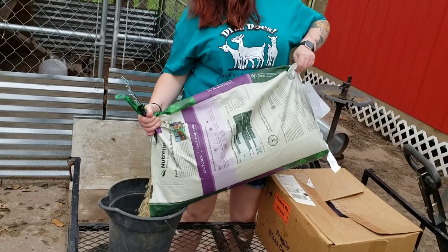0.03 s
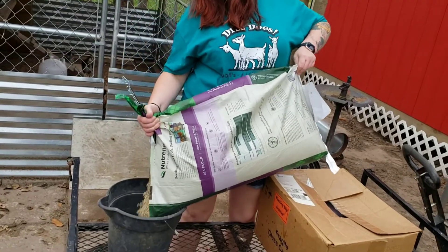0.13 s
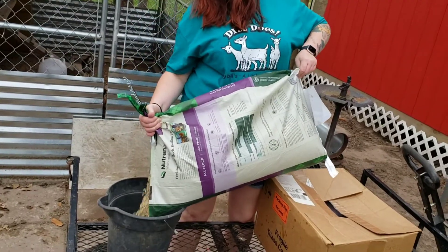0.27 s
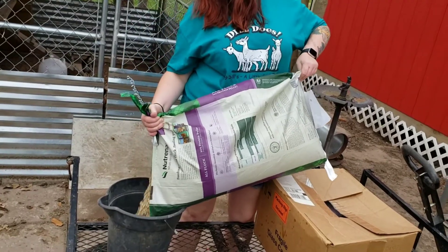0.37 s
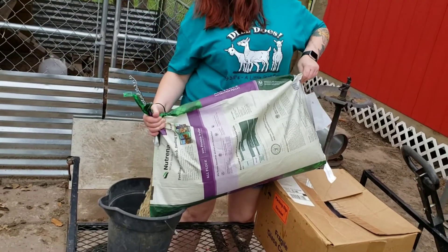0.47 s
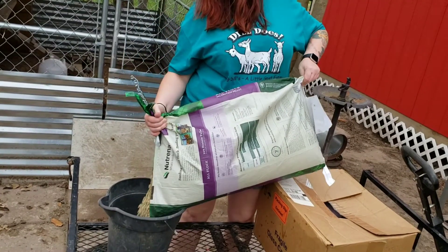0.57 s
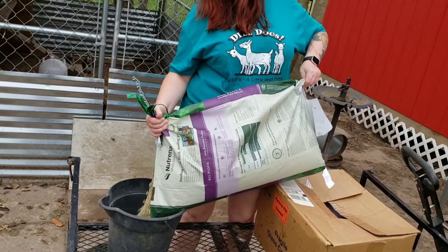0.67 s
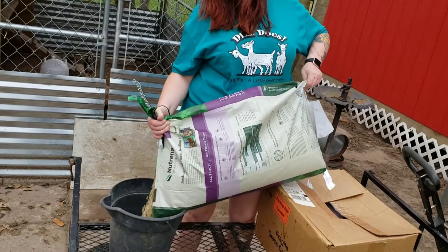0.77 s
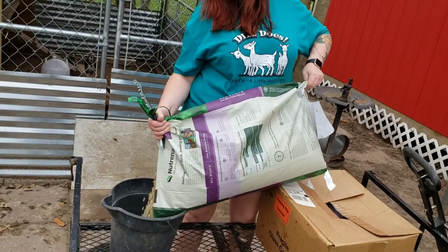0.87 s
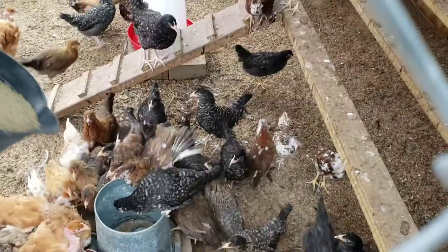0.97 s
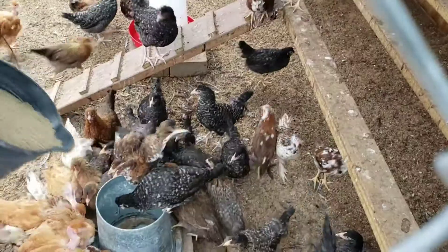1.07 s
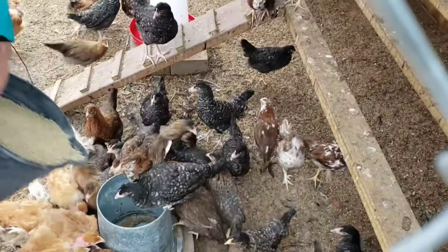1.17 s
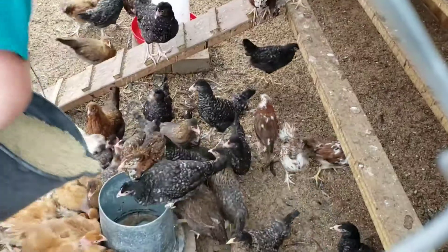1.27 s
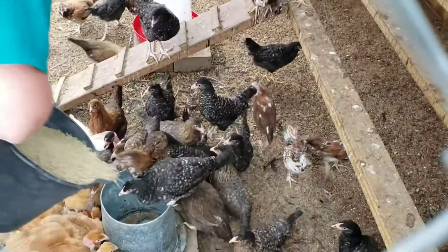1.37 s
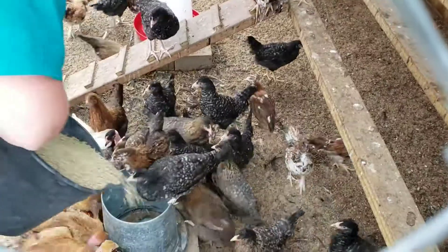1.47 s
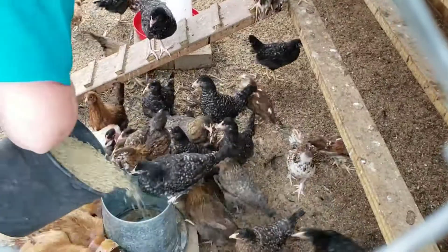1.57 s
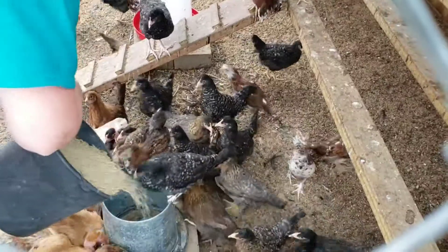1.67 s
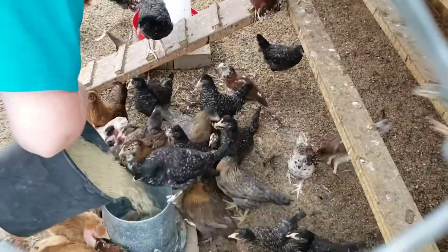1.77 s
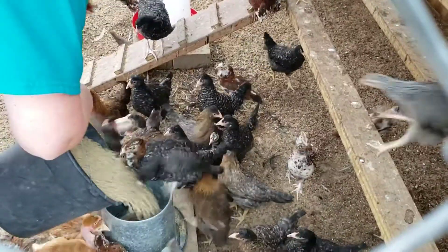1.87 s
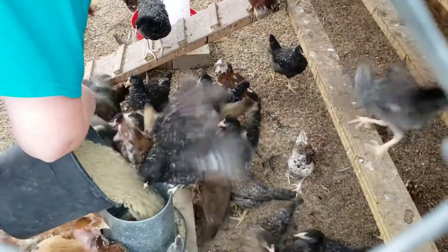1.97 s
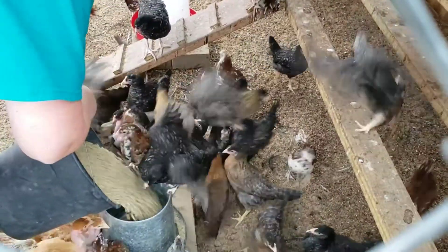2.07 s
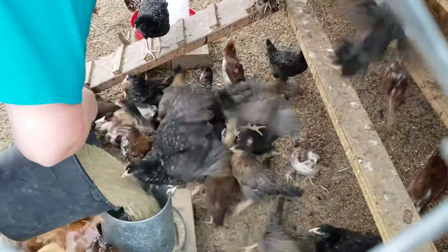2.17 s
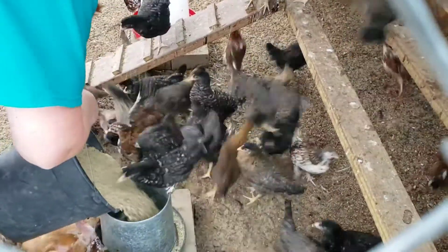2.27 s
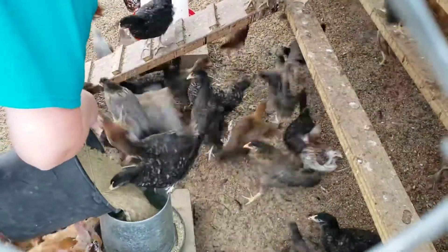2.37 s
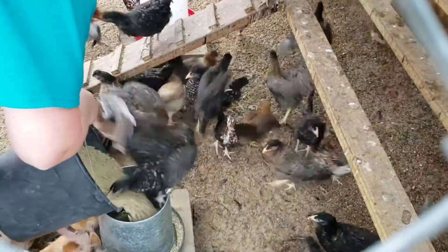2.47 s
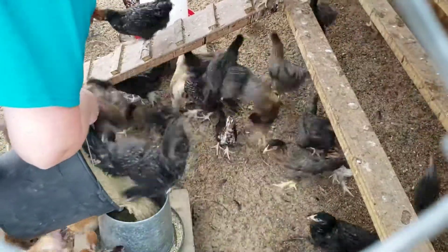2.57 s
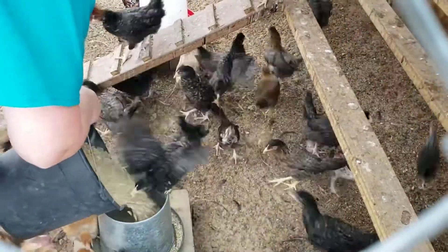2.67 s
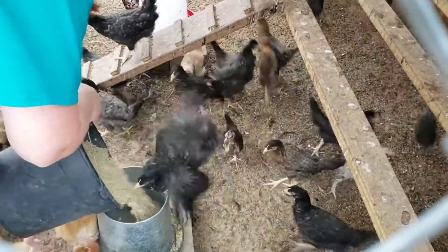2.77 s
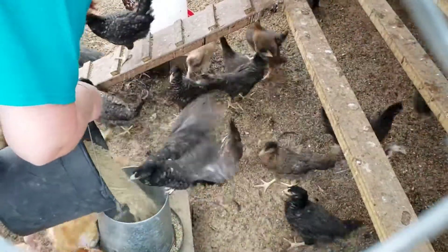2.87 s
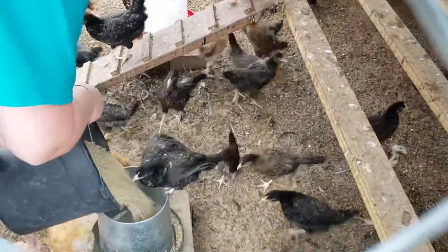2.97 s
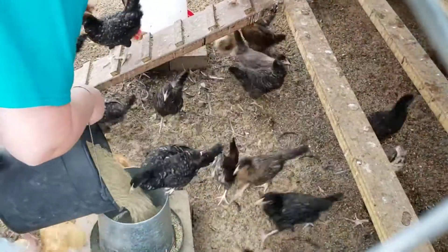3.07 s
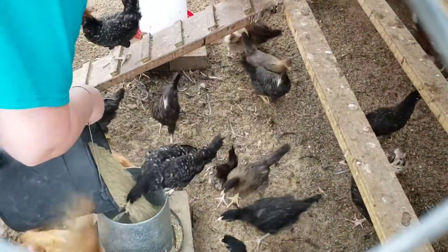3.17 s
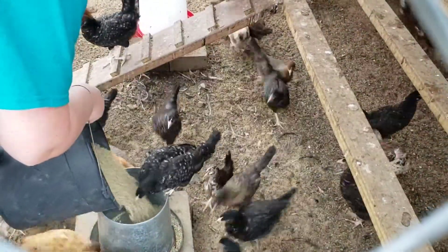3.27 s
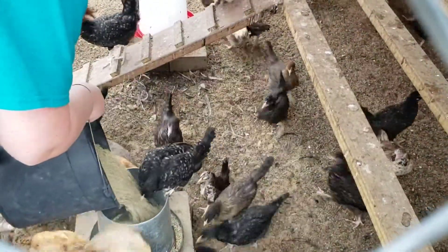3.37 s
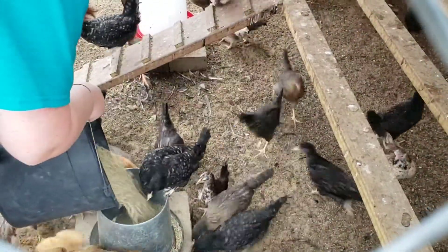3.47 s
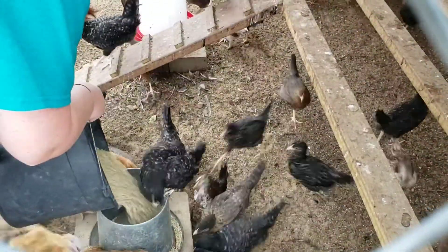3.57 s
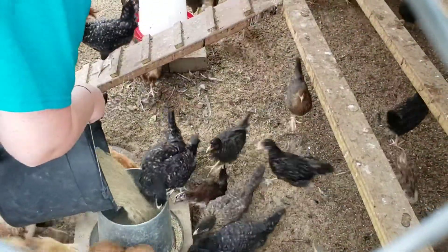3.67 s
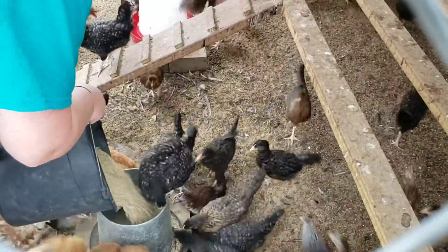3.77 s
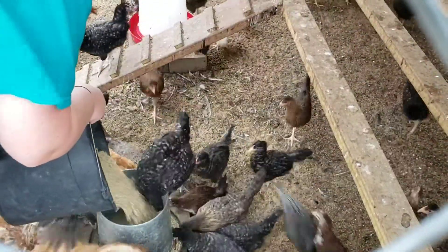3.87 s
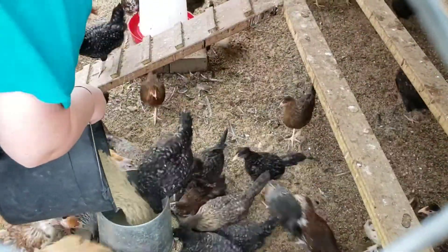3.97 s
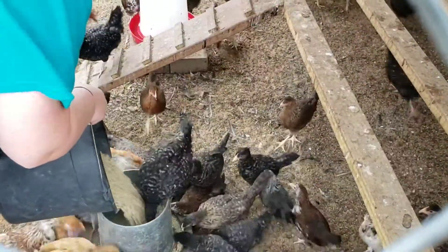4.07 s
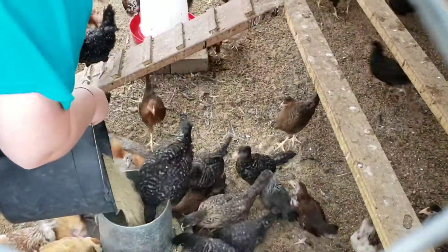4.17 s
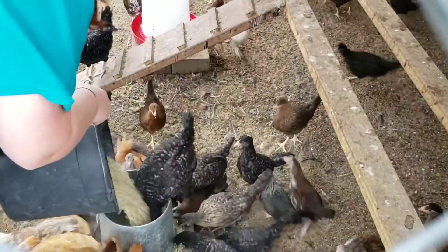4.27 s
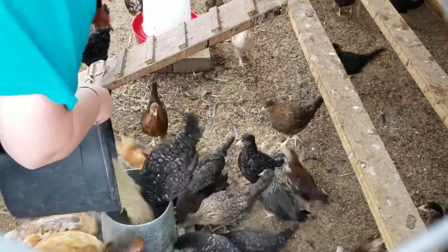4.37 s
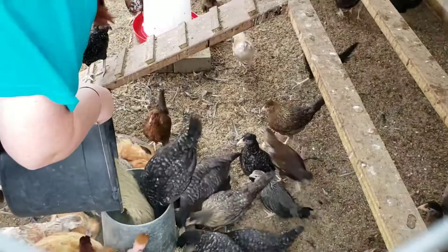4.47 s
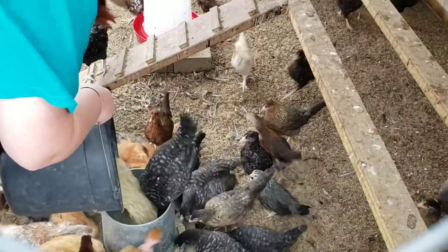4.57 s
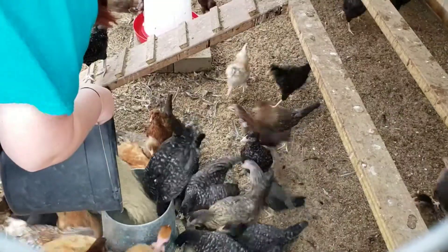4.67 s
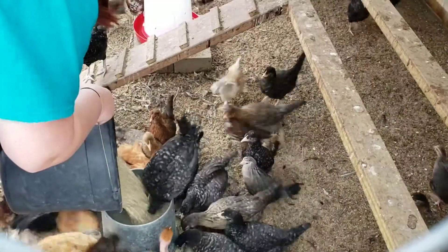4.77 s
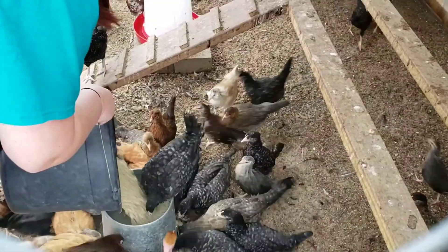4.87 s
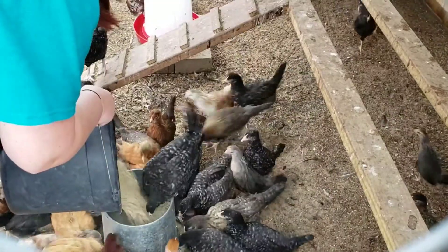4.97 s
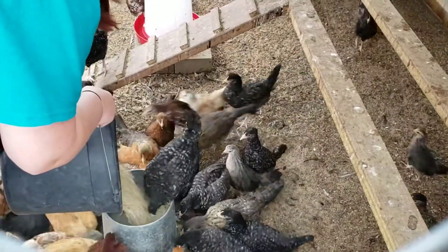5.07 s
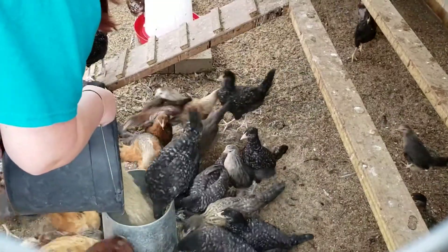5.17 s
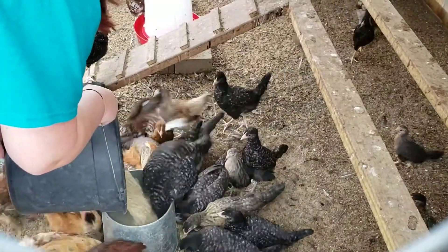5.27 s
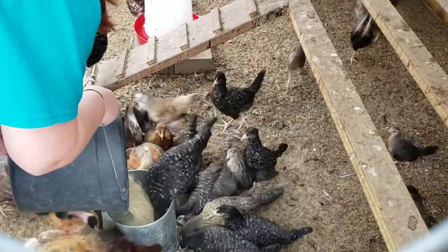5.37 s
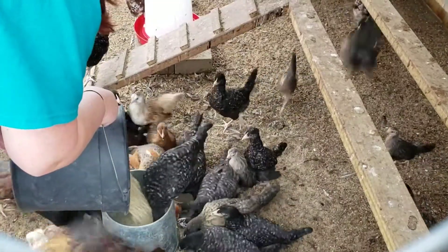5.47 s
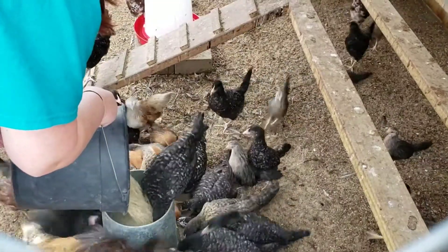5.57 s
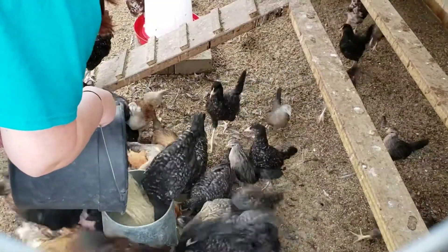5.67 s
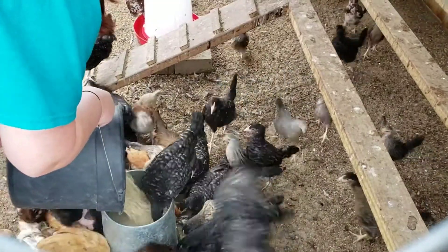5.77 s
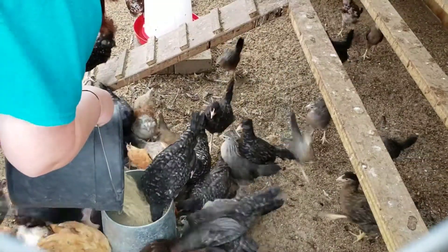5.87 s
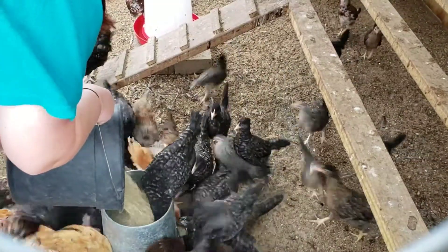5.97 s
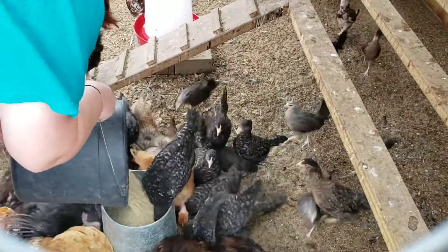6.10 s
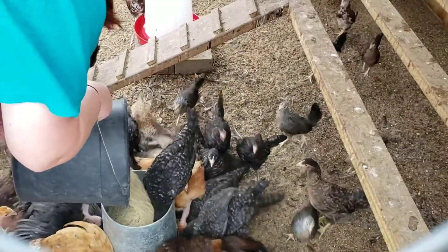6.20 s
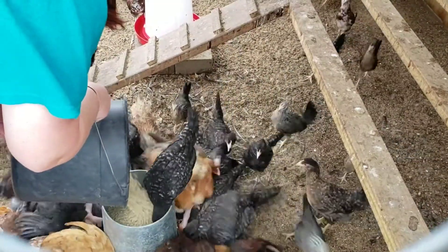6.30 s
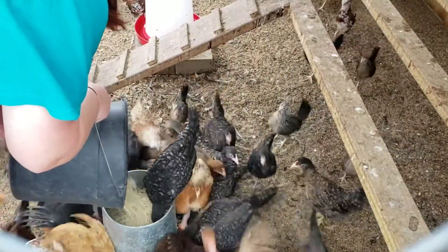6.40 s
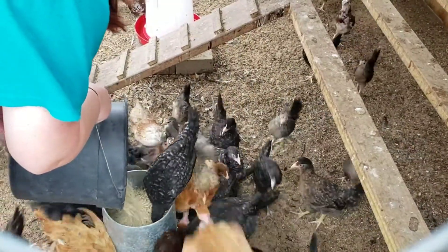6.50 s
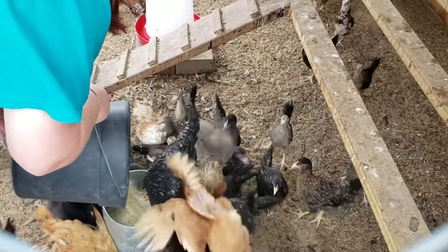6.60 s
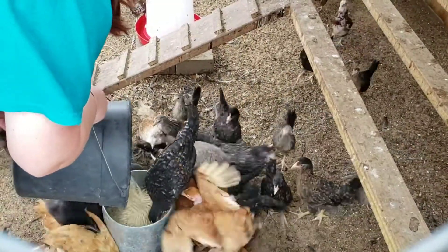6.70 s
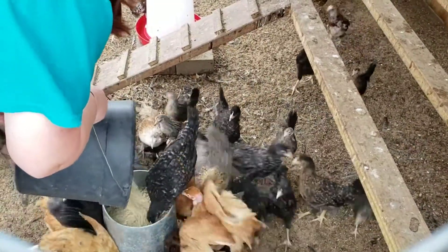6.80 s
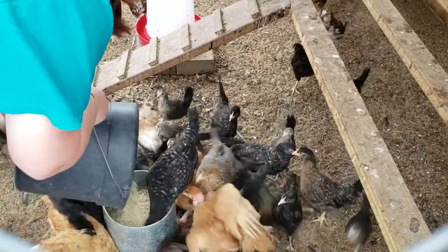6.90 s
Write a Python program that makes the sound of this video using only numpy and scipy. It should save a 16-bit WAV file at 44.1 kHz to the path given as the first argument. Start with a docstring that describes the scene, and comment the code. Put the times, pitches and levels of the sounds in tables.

```python
"""Dry feed rushes from a sack into a plastic bucket. A second later we are in the coop, where it is poured
into a sheet-metal feeder: it rings the bare metal, then patters dully on the growing heap. Young hens
crowd round, peeping, clucking and pecking, the rest of the flock faint behind them. A light wind
buffets the two ports of the stereo microphone throughout."""
import sys
import numpy as np
from scipy import signal
from scipy.fft import rfft, irfft, next_fast_len
from scipy.io import wavfile
from scipy.ndimage import uniform_filter1d

SR = 44100
rng = np.random.default_rng(int(sys.argv[2]) if len(sys.argv) > 2 else 0)


def store_wav(level_fs):
    """Save 16-bit WAV to argv[1]."""
    pcm = np.round(np.clip(np.atleast_2d(level_fs), -1, 1) * 32767)
    wavfile.write(sys.argv[1], SR, pcm.T.astype(np.int16))


N = 306054
TIME_S = np.arange(N) / SR
COOP_S, FIRST_GRAINS_S = .94, 1.596   # we move from bucket to coop; the stream reaches the metal


def from_db(db):
    """Gain of a level in dB."""
    return 10 ** (np.asarray(db) / 20)


def rms_one(x):
    """x scaled to rms 1."""
    return x / np.sqrt(np.mean(x ** 2) + 1e-20)


def in_time(rows):
    """A curve of (time_s, value) rows at every sample."""
    return np.interp(TIME_S, *np.transpose(rows))


def humps(rows):
    """Gain that swells quickly and dies away round each (centre_s, length_s, level_db)."""
    out = np.zeros(N)
    for centre_s, length_s, db in rows:
        late = (TIME_S - centre_s) / length_s
        out += from_db(db) * np.exp(-np.where(late < 0, 14.0, 6.0) * late ** 2)
    return out


def coloured(x, spectrum):
    """x through a smooth spectrum of (frequency_hz, gain_db) rows; rms 1."""
    size = next_fast_len(N)
    hz, db = np.transpose(spectrum)
    bin_hz = np.arange(size // 2 + 1) * SR / size
    gain = from_db(np.interp(np.log(bin_hz + 1), np.log(hz), db))
    return rms_one(irfft(rfft(x, size) * gain, size)[..., :N])


def drift(hz, channels=1):
    """Random wander of rms 1, mostly slower than hz."""
    r = np.exp(-40 * np.pi * hz / SR)
    noise = rng.standard_normal((channels, N // 20 + 3002))   # one value per 20 samples
    slow = signal.lfilter([1], [1, -2 * r, r * r], noise)[:, 3000:]
    return np.array([np.interp(np.arange(N) / 20, np.arange(len(s)), rms_one(s)) for s in slow])


def resonance(x, hz, width_hz):
    """Two-pole peak of gain 1."""
    r = np.exp(-np.pi * width_hz / SR)
    poles = [1, -2 * r * np.cos(2 * np.pi * hz / SR), r * r]
    return signal.lfilter(np.array([1, 0, -1]) * (1 - r * r) / 2, poles, x)


def at_ports(shared, own, alike):
    """A source at both ports, 4 samples later on the right, mixed with what each port hears alone."""
    return np.sqrt(alike) * np.array([shared, np.roll(shared, 4)]) + np.sqrt(1 - alike) * own


def place(out, start_s, sound, pan_db, lag_samples):
    """Adds a sound between the ports: pan favours the left; lag delays the left and advances the right."""
    for channel, side in enumerate([1, -1]):
        i = round(start_s * SR) + round(side * lag_samples)
        out[channel, i:i + len(sound)] += from_db(side * pan_db / 2) * sound


def grains(per_s, spread_db, alike):
    """Random impacts of uneven size at the two ports."""
    sizes = from_db(spread_db * np.minimum(rng.exponential(1, (3, N)), 4)) * rng.choice([-1, 1], (3, N))
    hits = sizes * (rng.random((3, N)) < per_s / SR)
    return at_ports(hits[0], hits[1:], alike)


def glides(start_s, length_s, hz, fall_octaves, db):
    """Rows for whistles() that fall through a middle pitch."""
    first_hz, last_hz = hz * 2 ** (fall_octaves / 2), hz * 2 ** (-fall_octaves / 2)
    return np.transpose([start_s, length_s, first_hz, last_hz, db])


def whistles(rows, waver, throb_db, rasp, spread_samples=1.8):
    """Gliding bird notes with a weak octave; pitch and strength tremble, breath noise widens the line."""
    out = np.zeros((2, N + SR))
    tremble, breath = drift(50.6, channels=2), drift(200, channels=2)
    for (s, length_s, first_hz, last_hz, db), (pan, lag, pick) in zip(rows, rng.random((len(rows), 3))):
        u = np.linspace(0, 1, round((length_s + 0.01208) * SR))
        i = int(pick * (N - len(u)))
        wobble, throb = tremble[:, i:i + len(u)]
        air = breath[:, i:i + len(u)]
        hz = (first_hz + (last_hz - first_hz) * u ** .65) * (1 + waver * wobble)
        phase = 2 * np.pi * np.cumsum(hz) / SR
        tone = np.sin(phase) + from_db(-18) * np.sin(2 * phase)
        tone += rasp * (air[0] * np.sin(phase) + air[1] * np.cos(phase))
        swell = np.sin(np.pi * u).clip(0) ** .85 * from_db(db + throb_db * throb)
        place(out, max(s - .006, .001), tone * swell, 6 * pan - 2, spread_samples * (lag - .5) - 1.5)
    return out[:, :N]


def wind():
    """Lumpy turbulence right on the microphone, its own at each port, and buffets that flutter higher."""
    # strength of the wind at the ports: time_s, level_db
    gusts = [(0, -43), (1.3, -42.5), (1.75, -49), (2.2, -55.5), (3.0, -46), (3.5, -41), (3.95, -52),
             (4.4, -40), (4.95, -53), (5.5, -43), (6.94, -40)]
    # buffets of air from gusts and wings: centre_s, length_s, level_db
    buffets = [(3.04, 0.15, -42), (3.29, 0.17, -46), (3.585, 0.067, -34), (4.23, 0.2, -41),
               (4.335, 0.041, -35), (5.62, 0.2, -36), (6.892, 0.17, -37)]
    # spectrum of the deep turbulence: frequency_hz, gain_db
    rumble_spectrum = [(15, -31), (40, -8), (65, 0.5), (110, -4.5), (200, -17), (400, -50)]
    # spectrum of the higher flutter: frequency_hz, gain_db
    flutter_spectrum = [(90, -3), (380, 1), (600, -12.5), (1000, -33.5)]
    lumps = from_db(3 * drift(12))
    rumble = coloured(rng.standard_normal((2, N)), rumble_spectrum)
    rumble *= from_db(3 * drift(14, channels=2)) * lumps
    flutter = coloured(rng.standard_normal((2, N)), flutter_spectrum)
    flutter *= from_db(3.5 * drift(30, channels=2))
    beats = from_db(4 * drift(28))   # a buffet comes in separate beats
    breeze = rms_one(rumble) * from_db([[-1.5], [1.5]]) + from_db(-6) * rms_one(flutter)
    buffeting = rms_one(beats * (flutter + 0.28 * rumble))
    return from_db(in_time(gusts)) * breeze + humps(buffets) * buffeting


def thumps():
    """Low knocks, mostly air on the ports and once a knock on the bucket: a low wave swells over half a cycle
    and loses 60 dB in four."""
    # single low thumps, air on the ports except a knock on the bucket at 0.458 s: start_s, level_db, pitch_hz
    thuds = [(0.307, -23, 64), (0.458, -23, 330), (1.366, -13.5, 180), (3.254, -29, 110), (3.483, -21, 89),
             (4.206, -19, 149), (4.255, -22.5, 120), (5.607, -19.5, 110), (5.662, -19, 130),
             (5.995, -20.5, 117), (6.634, -16.5, 170)]
    out = np.zeros((2, N + SR))
    for (start_s, db, hz), pan in zip(thuds, rng.random(len(thuds))):
        cycles = hz * TIME_S[:SR // 10]
        envelope = from_db(db - 60 * cycles / 4) * np.minimum(2 * cycles, 1)
        place(out, start_s, np.sin(2 * np.pi * cycles) * envelope, 10 * pan - 5, 20 * pan - 10)
    return out[:, :N]


def coop_walls(x):
    """The direct sound and two dull echoes off nearby walls, crossing sides."""
    # wall reflections: delay_s, gain_db
    echoes = [(.007, -10), (.019, -14)]
    dull = signal.lfilter([.4], [1, -.6], x[::-1])
    return x + sum(from_db(db) * np.pad(dull, ((0, 0), (round(s * SR), 0)))[:, :N] for s, db in echoes)


def flock(count=1000):
    """Farther back, many faint peeps overlap with the rustle of feet and feathers."""
    # bustle of the flock: time_s, level_db
    bustle = [(.93, -64), (.97, -45.5), (1.2, -40.5), (1.5, -47.5), (2.6, -45.5), (3.8, -53.5), (4.9, -45),
              (6.6, -41.5)]
    # spectrum of feet and feathers: frequency_hz, gain_db
    rustle_spectrum = [(200, -4.5), (380, 8), (600, 6), (1300, -1), (2600, 4), (5200, -4), (7800, -18)]
    when, length, pitch, fall, size = rng.random((count, 5)).T
    start_s, length_s = when * (N / SR - .1), .01 + .06 * length ** 2
    hz = 1050 * 4.1 ** pitch ** .8
    db = 12 * size ** 1.5 - 3 * pitch ** 2
    calls = np.transpose([start_s, length_s, hz, hz * (1 - .15 * fall), db])
    crowd = rms_one(whistles(calls, waver=.015, throb_db=3, rasp=.6, spread_samples=8))
    white = rng.standard_normal((3, N))
    rustle = coloured(at_ports(white[0], white[1:], alike=0.21), rustle_spectrum)
    rustle *= from_db(2 * drift(20, channels=2))
    return from_db(in_time(bustle) - 1.5) * (crowd + rustle)


def clucks():
    """Short runs of jittered pulses ring a hen's throat; the rougher the cluck, the more it climbs."""
    # single clucks: start_s, length_s, pulse_rate_hz, throat_hz, level_db, roughness (0-1)
    calls = [(2.701, 0.037, 718, 1610, -30, 0.35), (2.856, 0.03, 676, 1420, -34.5, 0.34),
             (4.199, 0.045, 336, 1820, -46.5, 0.1), (4.562, 0.035, 907, 1420, -37.5, 0.35)]
    out = np.zeros((2, N + SR))
    for start_s, length_s, rate_hz, throat_hz, db, rough in calls:
        u = np.linspace(0, 1, round(length_s * SR))
        jitter, shimmer, breath = rng.standard_normal((3, SR // 10))[:, :len(u)]
        climb = 1 + 0.8 * rough * (u - .5)
        hz = rate_hz * climb * (1 + 1.8 * rough * uniform_filter1d(jitter, size=40))
        pulses = np.diff(np.floor(np.cumsum(hz) / SR), prepend=0)
        pulses = pulses * (1 + rough * shimmer) + 0.17 * rough * breath
        throat = resonance(resonance(pulses, throat_hz, 600), throat_hz, 1000)
        voice = throat + 0.56 * resonance(pulses, 766, 200) + 0.36 * resonance(pulses, 2150, 500)
        swell = np.sin(np.pi * u ** 0.85) ** 0.42 * from_db(db)
        place(out, start_s, rms_one(voice) * swell, pan_db=1.5, lag_samples=-2)
    return out[:, :N]


def peeps():
    """Young hens near the microphone: each peep sags in pitch, the low voices less."""
    # single peeps: start_s, length_s, middle_pitch_hz, level_db
    calls = [(0.254, 0.071, 2680, -49), (0.945, 0.043, 2860, -41), (1, 0.0062, 1247, -40),
             (1.038, 0.031, 1233, -42.5), (1.035, 0.06, 3700, -42.5), (1.073, 0.2, 2104, -37),
             (1.078, 0.04, 2725, -31), (1.128, 0.07, 2820, -36), (1.169, 0.016, 1310, -36),
             (1.179, 0.049, 4270, -32.5), (1.196, 0.075, 2550, -38), (1.283, 0.017, 1208, -39.5),
             (1.303, 0.064, 2890, -37), (1.332, 0.06, 3480, -36), (1.341, 0.068, 2384, -38.5),
             (1.383, 0.071, 3070, -34.5), (1.388, 0.026, 1218, -41), (1.466, 0.085, 2065, -33),
             (1.473, 0.045, 3320, -36.5), (1.507, 0.085, 2596, -29.5), (1.549, 0.14, 3780, -35.5),
             (1.6, 0.008, 1205, -36), (2.263, 0.028, 1645, -36), (2.422, 0.05, 1499, -37),
             (2.799, 0.028, 1195, -41), (2.921, 0.018, 1178, -41.5), (2.939, 0.043, 2674, -39),
             (3.058, 0.031, 2530, -36.5), (3.108, 0.022, 2480, -43.5), (3.177, 0.013, 1284, -38.5),
             (3.249, 0.04, 3000, -42), (3.484, 0.05, 2610, -46.5), (3.528, 0.0058, 1203, -41),
             (3.685, 0.053, 1350, -50), (3.821, 0.027, 1230, -41.5), (3.992, 0.019, 2820, -45),
             (4.063, 0.058, 2900, -51), (4.259, 0.028, 2500, -44.5), (4.31, 0.051, 1250, -43),
             (4.679, 0.077, 3047, -42.5), (4.723, 0.015, 1656, -41), (4.85, 0.051, 2326, -41.5),
             (4.938, 0.092, 2260, -40.5), (5.004, 0.062, 2780, -38.5), (5.093, 0.053, 1520, -43),
             (5.198, 0.077, 2605, -40.5), (5.271, 0.023, 1533, -38), (5.343, 0.041, 2185, -40),
             (5.625, 0.053, 2107, -34), (5.74, 0.053, 2350, -36), (5.753, 0.026, 1189, -35.5),
             (5.875, 0.013, 1530, -38.5), (6.001, 0.043, 2536, -39.5), (6.143, 0.081, 3210, -38),
             (6.248, 0.038, 2490, -41), (6.56, 0.022, 1223, -37), (6.707, 0.056, 1295, -39.5),
             (6.733, 0.035, 2460, -39), (6.809, 0.051, 2830, -36.5), (6.839, 0.026, 1632, -32),
             (6.877, 0.034, 1292, -31.5), (6.934, 0.017, 2630, -31)]
    start_s, length_s, hz, db = np.transpose(calls)
    low = hz < 1800
    fall_octaves = np.minimum(3.4 * length_s, .42) * np.where(low, 0.23, 1)
    rows = glides(start_s, length_s, hz, fall_octaves, db)
    high_voices = whistles(rows[~low], waver=.011, throb_db=2.5, rasp=.38)
    return high_voices + whistles(rows[low], waver=.015, throb_db=2.2, rasp=.35)


def squawks():
    """Hoarse, breathy calls that fall steeply."""
    # single squawks: start_s, length_s, middle_pitch_hz, level_db
    calls = [(1.535, 0.02, 1270, -40), (3.323, 0.037, 1508, -45), (3.836, 0.054, 2670, -45),
             (5.158, 0.053, 1546, -35), (5.334, 0.046, 1124, -39.5), (5.594, 0.058, 2900, -32.5),
             (6.198, 0.073, 1500, -34), (6.462, 0.039, 3110, -33.5), (6.476, 0.021, 1392, -38),
             (6.592, 0.021, 2785, -33.5), (6.898, 0.043, 3420, -38)]
    start_s, length_s, hz, db = np.transpose(calls)
    rows = glides(start_s, length_s, hz, fall_octaves=8.56 * length_s, db=db)
    return whistles(rows, waver=.015, throb_db=2.5, rasp=.6)


def pecks():
    """Close ticks with gritty tails; small pecks ring the feeder's rim as the birds settle to eat."""
    # knocks on the bucket, then beaks on feed and rim: start_s, level_db
    strikes = [(0.437, -44), (0.6, -44), (3.0884, -41), (5.943, -33.5), (6.225, -31.5), (6.3, -32.5),
               (6.612, -30), (6.6563, -38.5)]
    rim_hz, rim_width_hz = 7700, 600
    eating_s, settle_db_per_s = 3.44, 16.5   # small pecks swell until most birds are eating
    ticks = np.zeros(N)
    tails = np.exp(-TIME_S[:600] / 0.0054) * rng.standard_normal((len(strikes), 600))
    for (start_s, db), tail in zip(strikes, tails):
        i = round(start_s * SR)
        ticks[i:i + 600] += from_db(db) * tail
    ticks = signal.sosfilt(signal.butter(2, 1500, "high", fs=SR, output="sos"), ticks)
    at_feeder = TIME_S > FIRST_GRAINS_S
    ringing = ticks + 8.1 * resonance(ticks, rim_hz, rim_width_hz)
    close = np.where(at_feeder, at_ports(ringing, own=0, alike=0.27), ticks)
    eating_db = -53.5 + settle_db_per_s * np.minimum(TIME_S - eating_s, 0)
    beaks = grains(150 * from_db(5.8 * drift(8.3)), spread_db=3.5, alike=0.057)
    eating = from_db(eating_db) * rms_one(resonance(beaks, rim_hz, rim_width_hz))
    # stray pellets and beaks tick all over the coop
    decays = signal.lfilter([1], [1, -.995], abs(grains(per_s=36, spread_db=4.0, alike=1)) + 1e-18)
    stray = at_feeder * rms_one(np.diff(decays * rng.standard_normal((2, N)), prepend=0))
    return close + eating + from_db(-71) * stray


def bucket():
    """Feed from the sack rushes into the plastic bucket and sounds its hollow and its wall."""
    blows = grains(per_s=6000, spread_db=1.5, alike=0.74)
    low_ring = resonance(resonance(blows, 780, 250), 1360, 460)
    high_ring = resonance(resonance(blows, 1840, 540), 2780, 1800)
    pouring = np.clip((COOP_S - TIME_S) / .02 + .5, 0, 1)
    return pouring * from_db(-48 + 1.64 * drift(43)) * rms_one(low_ring + 0.42 * high_ring)


def feeder():
    """Grains patter on each other; while the feeder's floor is bare they also ring the sheet metal."""
    # stream of feed into the feeder: time_s, level_db
    stream = [(0, -53.5), (1.594, -55), (1.598, -32.5), (1.65, -39), (1.72, -22), (1.82, -26), (1.9, -25.5),
              (1.96, -29), (2.0, -24.5), (2.1, -22), (2.3, -26.5), (2.55, -36.5), (2.95, -45), (4.0, -48.5),
              (5.0, -43.5), (5.8, -46), (6.94, -50.5)]
    # spurts of feed slipping over the lip: centre_s, length_s, level_db
    spurts = [(3.332, 0.099, -43), (4.114, 0.031, -42), (5.051, 0.032, -37), (5.18, 0.15, -48),
              (5.416, 0.054, -42), (6.115, 0.011, -39)]
    # modes of the sheet metal: pitch_hz, gain_db
    metal_modes = [(385, -3), (727, 3), (1740, -1), (2185, 6), (2300, 5), (2410, 5), (2663, 8), (3594, 7),
                   (3707, 5), (4782, 6), (5060, 5), (5227, 5), (6950, 3), (11800, -5)]
    # spectrum of grain landing on grain: frequency_hz, gain_db
    patter_spectrum = [(500, -68), (1200, 1.5), (2500, -2), (6200, 5), (9000, -0.5), (12000, 0.5),
                       (15600, 0)]
    buried_s, choke_db_per_s, choked_db = 2.31, 26.5, -43   # the heap covers the floor, choking the ring
    bare = (TIME_S > FIRST_GRAINS_S) * from_db(np.clip(choke_db_per_s * (buried_s - TIME_S), choked_db, 0))
    stream_db = in_time(stream)
    flow = 12000 * from_db(.4 * (stream_db + 32.5))   # a thin stream lets single grains through
    landings = grains(flow * from_db((4.5 - 1.8 * bare) * drift(30)), spread_db=2.0, alike=0.13)
    patter = from_db(-.2 * (stream_db + 44)) * coloured(landings, patter_spectrum)
    blows = grains(5000 * from_db(2 * drift(30)), spread_db=4.0, alike=0.96)
    wander_db = 3 * drift(9, channels=len(metal_modes))   # the stream favours now one mode, now another
    ring = sum((-1) ** k * from_db(db + wander_db[k]) * resonance(blows, hz, width_hz=22 + .005 * hz)
               for k, (hz, db) in enumerate(metal_modes))
    weak_modes = resonance(blows, 3300, 1840)
    surge = from_db(1.5 * (1 - 1.33 * bare) * drift(20))   # the trickle is uneven
    return (from_db(stream_db) * surge + humps(spurts)) * (patter + bare * rms_one(ring + weak_modes))


def scene():
    """Birds in the coop, the two pours and the wind, as they reach the ports."""
    birds = peeps() + squawks() + clucks() + flock()
    return coop_walls(birds) + bucket() + feeder() + pecks() + wind() + thumps()


def record(dry):
    """The microphone housing notches the treble, more for the way it faces in the coop; the top is cut."""
    notch_depth, cutoff_hz = np.where(TIME_S > COOP_S, .7, .3), 15550
    notched = dry - notch_depth * resonance(dry, hz=8800, width_hz=1000)
    return signal.sosfilt(signal.ellip(12, .5, 90, cutoff_hz, fs=SR, output="sos"), notched)


dry = scene()
out = record(dry)
store_wav(out)
```